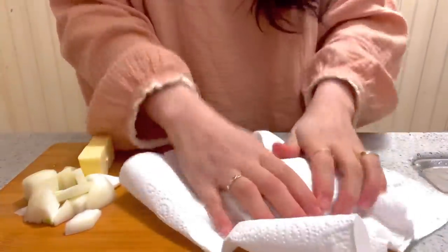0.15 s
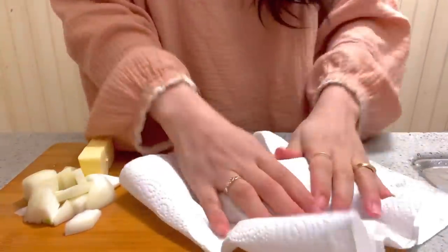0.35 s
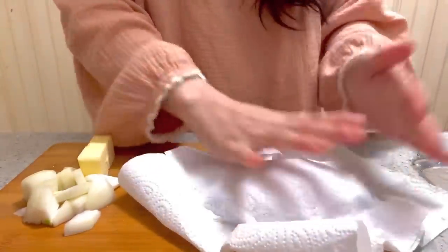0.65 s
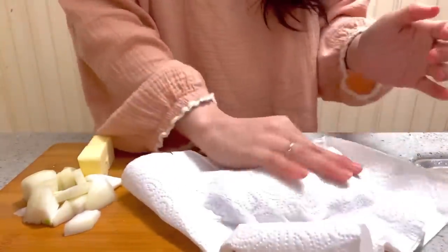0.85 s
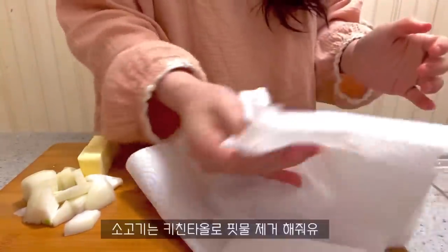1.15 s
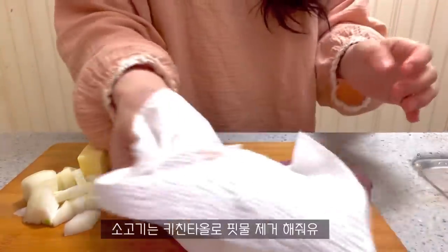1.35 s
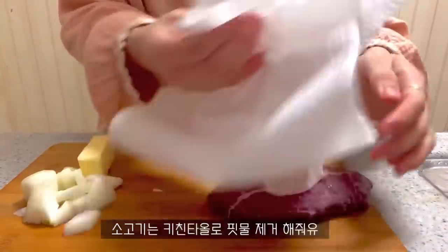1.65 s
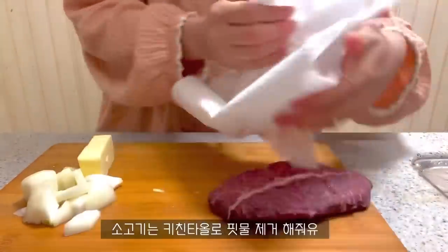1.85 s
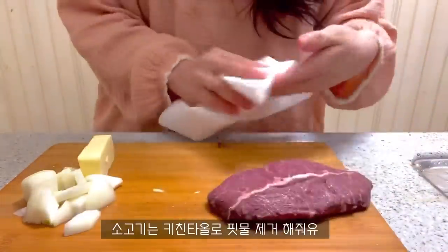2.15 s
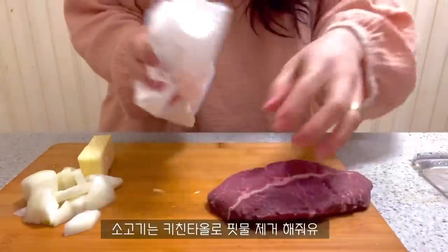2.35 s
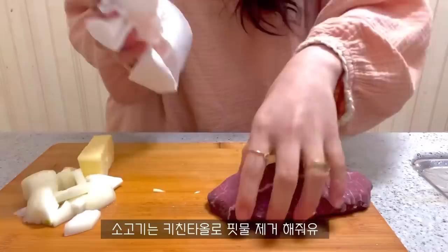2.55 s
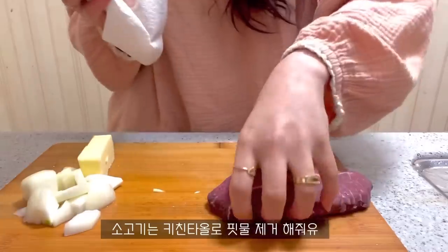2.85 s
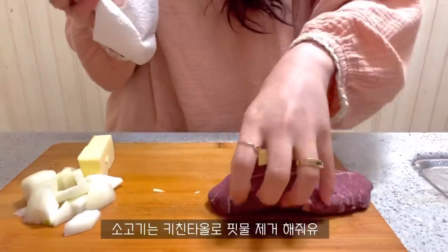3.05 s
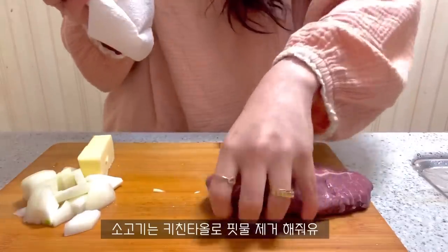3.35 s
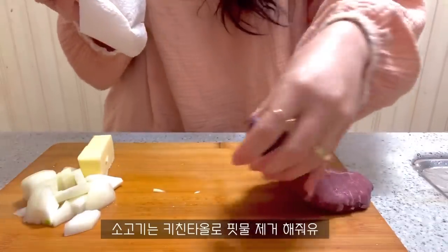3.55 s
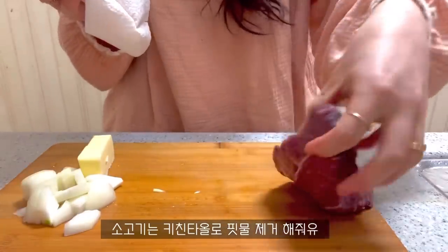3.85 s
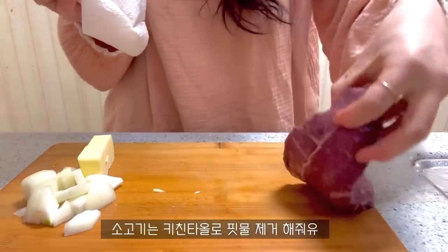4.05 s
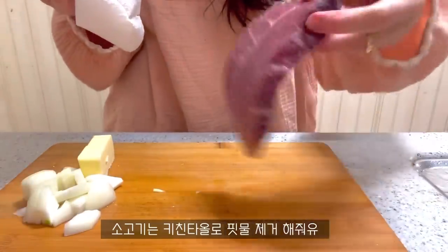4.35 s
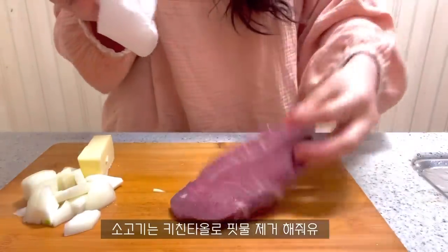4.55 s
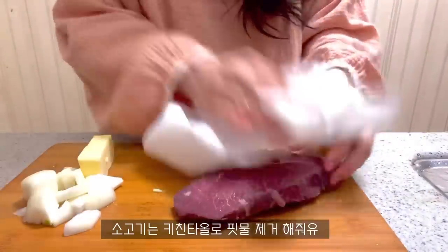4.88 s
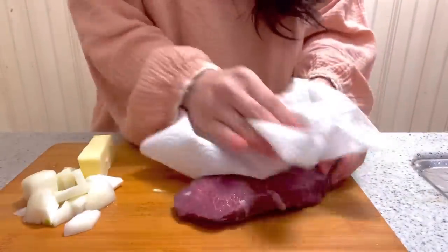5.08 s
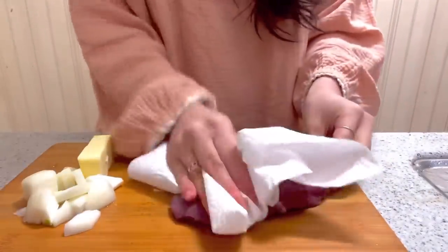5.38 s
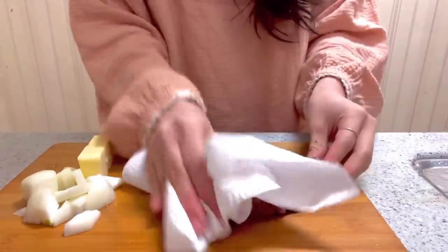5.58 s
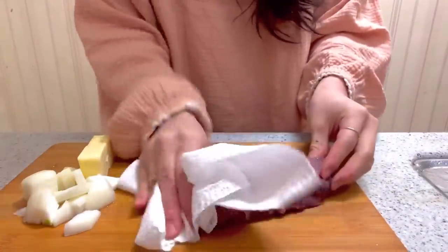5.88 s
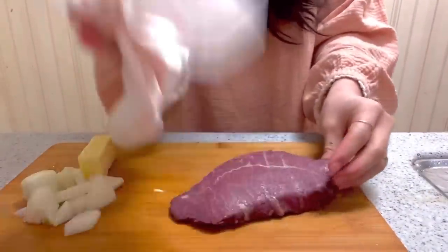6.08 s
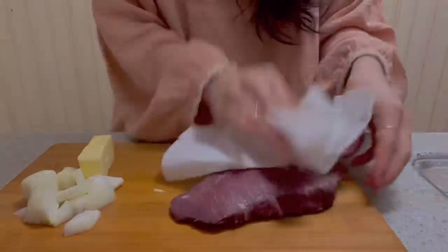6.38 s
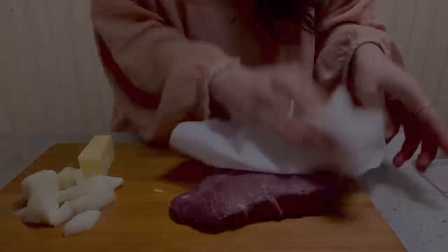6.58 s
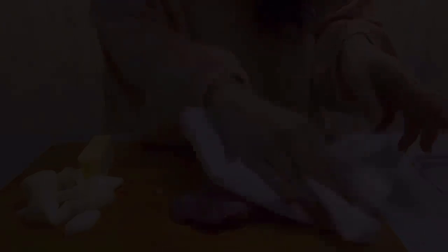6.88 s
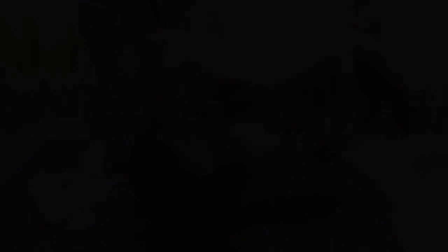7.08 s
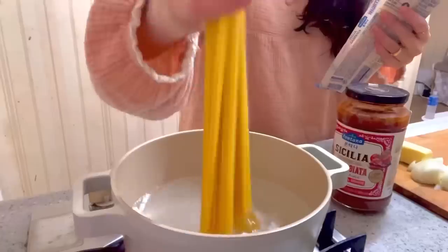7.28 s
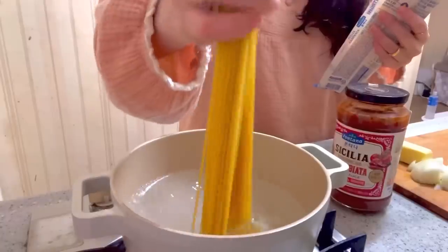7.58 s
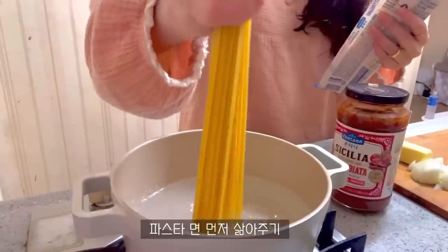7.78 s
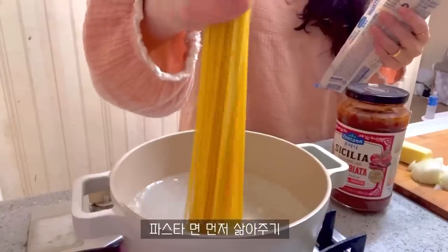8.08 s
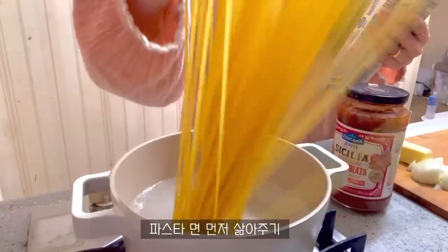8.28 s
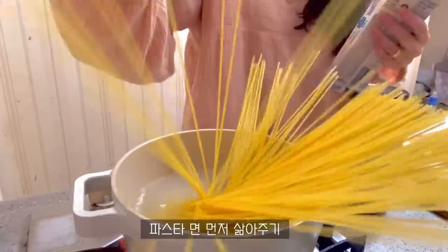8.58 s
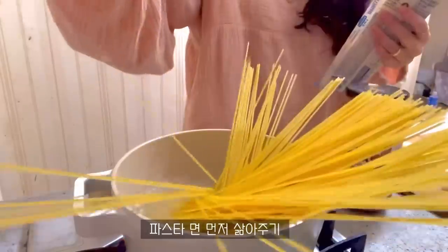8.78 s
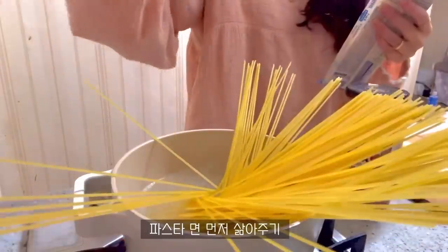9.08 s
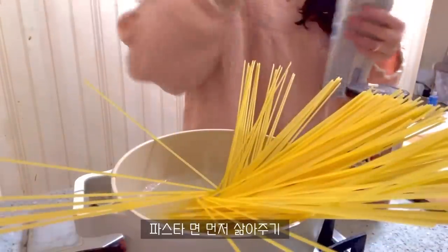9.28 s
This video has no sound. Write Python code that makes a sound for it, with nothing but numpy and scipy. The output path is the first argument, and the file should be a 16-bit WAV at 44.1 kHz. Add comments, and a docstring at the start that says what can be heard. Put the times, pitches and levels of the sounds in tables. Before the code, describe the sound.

Hands pat meat with a paper towel in soft thumps, then dry spaghetti taps and clatters into a pot, over a rumbling fan.

```python
"""Hands pat meat dry with a paper towel on a board: each pat puffs out air and thumps the counter.
Then the sound cuts to the stove: dry spaghetti is tapped on the floor of a pot over a gas burner and
let go to fan out, ticking and rubbing; at the end fat sizzles. A fan rumbles throughout.
A phone close by hears it all through two microphone ports a few centimetres apart."""
import sys
import numpy as np
from scipy import signal
from scipy.fft import rfft, irfft, next_fast_len
from scipy.io import wavfile
from scipy.ndimage import uniform_filter1d

SR = 44100
rng = np.random.default_rng(int(sys.argv[2]) if len(sys.argv) > 2 else 0)


def to_wav(s):
    """Save 16-bit WAV."""
    ch = np.atleast_2d(s).T  # columns
    pcm = np.round(np.clip(ch, -1, 1) * 32767)  # PCM
    wavfile.write(sys.argv[1], SR, pcm.astype(np.int16))


N = 415863

# Levels are relative. A fade_s or t60 is the time a sound takes to drop by 60 dB.
# fan and burner over time: time_s, rumble_db, hiss_db, sideways_lean
AIR_LEVELS = [(0, -36, -57.5, 1), (1.5, -37.5, -55, 4.5), (4.4, -39, -56, 4), (4.9, -37, -53.5, 2),
              (7.2, -36.5, -59, -1), (7.22, -39.5, -52.5, 4.5), (9.43, -40.5, -54.5, 3)]
# tone of each noise, from bass to treble: pitch_hz, level_db
RUMBLE_TONE = [(25, -24), (60, -9.5), (100, -10), (150, -1), (260, -7.5), (330, -22), (520, -32),
               (720, -37.5), (3000, -47)]
HISS_TONE = [(600, 18.5), (1000, 19), (3000, 5), (5800, -10.5), (8000, 2.5), (12000, -6), (15500, -23)]
FLAME_TONE = [(50, -16), (110, 1), (165, 3), (220, -17), (400, -41)]
FAT_TONE = [(500, -1), (1200, 6), (2600, 8), (5000, 0.5), (8000, 0.5), (15500, -2)]
PAPER_TONE = [(400, 7.5), (800, 2), (1500, 3.5), (3000, -2.5), (5500, -6), (9000, -7), (15500, -16)]
# pitches that stand out of the rumble and the two hisses: pitch_hz, width_hz, boost_db
RUMBLE_PEAKS = [(64.4, 5.6, 10), (138.9, 26, 8.5), (261.3, 49, 5), (354.6, 15, 11), (447.6, 35, 12),
                (936, 56, 18)]
FAN_PEAKS = [(7320, 160, 12.5), (7600, 144, 13.5), (8450, 68, 14), (9540, 135, 15.5)]
BURNER_PEAKS = [(868.5, 15, 16), (1490, 150, 10), (4470, 230, 13), (8420, 650, 20), (13100, 7600, -5)]
# notes that each thing rings with when hit: pitch_hz, level_db, fade_s
POT_NOTES = [(1930, -6, 0.02), (2103, -3, 0.034), (2245, 0.5, 0.027), (2483, -0.5, 0.02), (3060, 0, 0.0094),
             (4010, -5.5, 0.013), (4470, -10, 0.012)]
POT_WALL_NOTES = [(279, -5, 0.14), (290, -2.5, 0.084), (543, -4.5, 0.056), (1140, -4.5, 0.04),
                  (1450, 4, 0.084)]
COUNTER_NOTES = [(50.45, 5, 0.29), (70.5, 2.5, 0.21), (114, 6, 0.061), (262, -9.5, 0.12)]
# notes of the dry strands: pitch_hz, fade_s, level_db
STRAND_NOTES = [(4440, .015, -15), (4890, .05, -11), (7300, 0.006, -10.5), (8200, 0.0085, -12),
                (10070, .05, -14.5), (10980, 0.018, -8)]
# single strands snap against the rim: start_s, level_db, fade_s
RIM_SNAPS = [(8.305, -32, 0.067), (8.364, -38, .04), (8.662, -38, 0.17), (8.735, -30, 0.02),
             (8.756, -31, 0.016), (8.765, -36, 0.034), (8.919, -38, 0.02)]
# spaghetti ends hit the pot: start_s, level_db, fade_s, treble_db
BUNDLE_TAPS = [(7.264, -16.5, 0.053, -9), (7.275, -29, 0.22, -6), (7.586, -17, 0.072, -9.5),
               (7.631, -40, 0.25, -1.5), (8.104, -17.5, 0.13, -11.5), (8.162, -29.5, 0.28, -18),
               (8.218, -34.5, 0.082, -9)]
# the loose bundle knocks the rim, then falls against the wall: start_s, level_db, contact_s
BUNDLE_FALLS = [(8.411, -32, 0.00026), (8.427, -16, 0.00089)]
# a lone strand ticks the pot: start_s, level_db, pitch_hz, fade_s
STRAND_TICKS = [(7.216, -30, 800, .012), (7.373, -34, 3170, .04), (7.524, -34, 3230, .07),
                (7.668, -37, 3150, .04), (8.411, -21, 3700, 0.044), (8.679, -36, 4930, .04)]
# wet meat lets go of board and fingers: start_s, level_db, pitch_hz, fade_s
WET_SMACKS = [(2.757, -45, 3400, .02), (2.986, -43.5, 6960, .035), (3.159, -37, 2650, 0.0086),
              (3.195, -40.5, 730, 0.12), (3.229, -35.5, 2640, 0.08), (3.232, -40.5, 5800, 0.066),
              (3.235, -42, 1400, 0.17), (3.356, -27.5, 4670, 0.01), (3.448, -35, 6200, 0.011),
              (3.47, -30.5, 9700, 0.011), (4.548, -38.5, 2220, 0.023)]
# the towel is pulled, folded or rubbed: start_s, hold_s, level_db
TOWEL_PULLS = [(0.14, 0.049, -55), (.78, 0.055, -55), (1.05, 0.47, -47), (2.05, 0.074, -51.5)]
# short taps and puffs on the towel, and longer crumples: peak_s, level_db, width_s, trapped_air_hz
TOWEL_TOUCHES = [(.145, -45, .002, 4000), (.385, -52, 0.025, 2100), (.728, -44, 0.0038, 1350),
                 (1.361, -36, 0.0054, 796), (4.91, -44.5, 0.0086, 1010), (5.095, -45, 0.041, 1590),
                 (5.285, -45.5, 0.025, 1090), (5.461, -39, 0.0086, 2070), (5.615, -48, .028, 2010),
                 (5.805, -42.5, 0.0086, 1060), (6.04, -51, 0.029, 1100), (6.61, -48, 0.024, 1200),
                 (6.75, -41, 0.011, 840), (6.925, -46.5, 0.027, 900)]
# a hand pats the meat through the towel: time_s, slap_db, thump_db, trapped_air_hz
HAND_PATS = [(.196, -60, -30, 1200), (.434, -59, -33.5, 960), (0.706, -59, -33, 1220),
             (4.932, -34, -21.5, 605), (5.173, -39.5, -21.5, 1440), (5.355, -36.5, -21.5, 2020),
             (5.525, -38.5, -25.5, 1490), (5.706, -40, -21.5, 3350), (5.878, -41, -27.5, 1320),
             (6.322, -35.5, -23, 1910), (6.525, -39.5, -27.5, 1110), (6.722, -43.5, -21, 2140),
             (6.893, -41, -20.5, 690)]
# how the two ports differ: pitch_hz, half_phase_gap_turns, share_heard_alike (0 to 1)
PORT_GAPS = [(60, .03, .5), (250, .06, .3), (600, .125, .2), (5000, .13, .2), (6000, .165, .5),
             (7000, .1, .6), (7700, 0., 1.), (9400, 0., 1.), (10300, -.12, .6), (11300, -.247, 1.),
             (12800, -.253, 1.), (13600, -.38, .5), (14500, -.5, 1.)]

STOVE_SCENE_S = 7.21
TIME_S = np.arange(N) / SR


def undb(db):
    """Turn decibels into a gain to multiply by."""
    return 10 ** (np.asarray(db) / 20)


def unit(x):
    """Scale to an average (rms) level of 1."""
    return x / np.sqrt(np.mean(x ** 2))


def noise(length=N):
    """Two unrelated streams of white noise."""
    return rng.standard_normal((2, length))


def colour(x, tone, peaks=()):
    """Shape a sound by a tone curve and peaks; it comes out at level 1."""
    size = next_fast_len(N)
    freqs = np.arange(1, size // 2 + 2) * SR / size
    tone_hz, tone_db = np.transpose(tone)
    db = np.interp(np.log(freqs), np.log(tone_hz), tone_db)
    db += sum(boost / (1 + (2 * (freqs - hz) / width) ** 2) for hz, width, boost in peaks)
    return unit(irfft(rfft(x, size) * undb(db), size)[..., :N])


def ring(x, hz, t60):
    """Each push in x sets off one fading note."""
    pole = np.exp(2j * np.pi * hz / SR - np.log(1000) / (max(t60, 1e-3) * SR))
    return signal.lfilter([0, pole.imag], [1, -2 * pole.real, abs(pole) ** 2], x)


def wander(rate_hz):
    """Glide between random values, mostly within 1 of zero."""
    step = int(SR / rate_hz)
    held = np.repeat(rng.standard_normal(N // step + 1), step)
    return 1.2 * uniform_filter1d(held, step)[:N]


def crackle(per_s, spread_db):
    """Two streams of random clicks of uneven size."""
    clicks = (rng.random((2, N)) < per_s / SR) * noise()
    return unit(clicks * undb(spread_db * np.minimum(rng.exponential(size=(2, N)), 3)))


def bursts(rows, rise_s):
    """A gain that jumps up and fades for each row."""
    gain, t = np.zeros(N), np.arange(SR // 2) / SR
    for start_s, db, t60 in rows:
        i = int(start_s * SR)
        burst = undb(db - 60 * t / t60) * (1 - np.exp(-t / rise_s))
        gain[i:i + len(t)] += burst[:N - i]
    return gain


def swell(start_s, hold_s, db, rise_db_s=0, fall_db_s=0):
    """A gain that rises until start_s, holds, then falls."""
    before, after = np.maximum(start_s - TIME_S, 0), np.maximum(TIME_S - start_s - hold_s, 0)
    return undb(db - rise_db_s * before - fall_db_s * after)


def push(start_s, db, contact_s):
    """A soft hit: one smooth hump of force, duller the longer it lasts."""
    force, i, k = np.zeros(N), int(start_s * SR), int(contact_s * SR)
    force[i:i + k] = undb(db) * np.sin(np.pi * (np.arange(k) + .5) / k) * np.pi / 2 / k
    return force


def pops(rows):
    """Small clicks, each a short burst of noise around one pitch."""
    out, length = np.zeros((2, N)), SR // 5
    for start_s, db, hz, t60 in rows:
        i = int(start_s * SR)
        spit = noise(length) * undb(db - 60 * np.arange(length) / SR / t60)
        out[:, i:i + length] += .22 * ring(spit, hz, 5 / hz) + .06 * ring(spit, hz, 22 / hz) + .22 * spit
    return out


def room(x, fade_s=0.22, echo_db=-6):
    """The walls add a short echo; the second stream stands for scattered sound."""
    t = np.arange(SR // 3) / SR
    echo = noise(len(t)) * undb(-60 * t / fade_s)
    echo *= undb(echo_db) / np.sqrt(np.sum(echo ** 2, axis=1, keepdims=True))
    echo[0, 0], echo[1, 19] = 1, 1  # the first sound to arrive
    return signal.fftconvolve(x, echo, axes=1)[:, :N]


def ports(direct, scattered):
    """Sound reaches one port later, so their sum and difference cancel in turn up the treble."""
    size = next_fast_len(N)
    log_hz = np.log(np.arange(1, size // 2 + 2) * SR / size)
    hz, turns, share = np.transpose(PORT_GAPS)
    half_gap = 2 * np.pi * np.interp(log_hz, np.log(hz), turns)
    alike = np.clip(np.interp(log_hz, np.log(hz), share), 0, 1)
    direct, scattered = np.sqrt(2) * rfft([direct, scattered], size)
    mid = np.cos(half_gap) * direct
    side = np.sin(half_gap) * (-1j * alike * direct + np.sqrt(1 - alike ** 2) * scattered)
    return irfft(np.array([mid + side, mid - side]), size)[:, :N]


def fan_and_burner(roar_db=-35):
    """A fan rumbles and hisses; the sound cuts to the stove, where a burner already roars and hisses."""
    times, *columns = np.transpose(AIR_LEVELS)
    rumble_db, hiss_db, lean = [np.interp(TIME_S, times, column) for column in columns]
    fan, gas, draught, flame = noise(), noise(), noise(), noise()
    rumble = colour(fan, RUMBLE_TONE, RUMBLE_PEAKS) * undb(rumble_db + 1.33 * wander(12))
    rumble[1] += 0.12 * lean * rumble[0]  # moves the rumble to one side
    at_stove = TIME_S > STOVE_SCENE_S
    hiss = np.where(at_stove, colour(gas, HISS_TONE, BURNER_PEAKS), colour(draught, HISS_TONE, FAN_PEAKS))
    roar = at_stove * colour(flame, FLAME_TONE) * undb(roar_db + 3.04 * wander(13))
    return rumble + roar + hiss * undb(hiss_db)


def sizzle(start_s=9.366, rise_s=0.021, level_db=-29):
    """Water in hot fat bursts in a dense crackle."""
    rise = np.clip((TIME_S - start_s) / rise_s, 0, 1)
    return colour(crackle(5000, 1.8) + 1.2 * noise(), FAT_TONE) * rise * undb(level_db)


def strands(let_go_s=8.364, clatter_s=8.41, settled_s=8.62):
    """Brittle strands rub and tick on each other and the rim; their notes come and go as they touch."""
    slide = (TIME_S > let_go_s) * swell(let_go_s, hold_s=0, db=-36.5, fall_db_s=25)
    slide *= swell(settled_s, hold_s=0, db=0, fall_db_s=152)
    slide += swell(clatter_s, hold_s=0.064, db=-34.5, rise_db_s=253, fall_db_s=250)  # the bundle falls
    ticks = crackle(2600, 1.8) + .5 * noise()
    rattle = colour(ticks, [(700, -13), (1500, -14), (3500, -9), (5500, -6), (8000, 1), (15500, -2.5)])
    for hz, t60, db in STRAND_NOTES:
        touch = undb(6 * wander(30))
        rattle += undb(db) * unit(ring(ticks * touch, hz, t60))
    slide *= undb(1.6 * wander(100))
    return rattle * (slide + bursts(RIM_SNAPS, rise_s=0.00055))


def pot(ring_db=-29.5, rise_s=0.0017):
    """Spaghetti ends land as a shower of clicks that rings the pot; the falling bundle booms its wall."""
    shower = unit(crackle(3000, 2) + .5 * noise())
    taps = shower * bursts([row[:3] for row in BUNDLE_TAPS], rise_s)
    # each note answers a little differently as the ends land in new places
    body = sum(undb(ring_db + db) * ring(taps * undb(2.8 * wander(9)), hz, t60)
               for hz, db, t60 in POT_NOTES)
    edge = colour(shower, [(400, 10.5), (1300, -12), (4500, 2), (6000, 13), (8500, 11.5), (15500, 6)])
    edge *= bursts([(s, db + treble_db, t60) for s, db, t60, treble_db in BUNDLE_TAPS], rise_s)
    force = sum(push(*row) for row in BUNDLE_FALLS)
    boom = sum(undb(db) * ring(force, hz, t60) for hz, db, t60 in POT_WALL_NOTES)
    return body + edge + pops(STRAND_TICKS) + boom * np.array([[1], [.3]])


def meat():
    """Wet meat clicks as it comes unstuck."""
    return pops(WET_SMACKS)


def counter(fingers_s=0.01268, palm_s=0.0293, meat_lands_s=4.547):
    """Every blow comes in two pushes, like fingers and then palm; the counter and board ring low."""
    blows = [(s, db) for s, _, db, _ in HAND_PATS] + [(meat_lands_s, -38.5)]
    # knocks on the pot go on into the counter, later and weaker
    blows += [(s + 0.00765, db - 8) for s, db, *_ in BUNDLE_TAPS]
    (knock_s, _, _), (_, fall_db, _) = BUNDLE_FALLS
    blows.append((knock_s, fall_db - 9))
    force = sum(push(s + fingers_s, db, 0.002) + push(s + palm_s, db + 0.5, 0.0035) for s, db in blows)
    return -sum(undb(db) * ring(force, hz, t60) for hz, db, t60 in COUNTER_NOTES)


def towel(rest_db=-61.5, swish_even_db=-46.5, slap_s=0.0096, long_touch_s=.012, hollow_db=-5.5):
    """Creases crackle over a soft swish; each pat squeezes out a puff of air with a hollow note."""
    pull = undb(rest_db) * (TIME_S < STOVE_SCENE_S)  # the towel lying in the hand
    pull += sum(swell(*row, rise_db_s=114, fall_db_s=139) for row in TOWEL_PULLS)
    paper = colour(crackle(6000, 2.8) + 0.7 * noise(), PAPER_TONE)
    puff = colour(crackle(5000, 1.2),
                  [(200, 3.5), (650, 10), (1200, 0), (3300, -10), (6000, -12), (15500, -15.5)])
    # a fast pull drags air along: above swish_even_db the swish outgrows the crackle
    swish = colour(noise(), [(250, -4), (850, 1.5), (2200, -50)])
    swish *= pull ** 2 * undb(2.5 * wander(25) - swish_even_db)
    touches = [(s, db, width_s, hz, paper + puff if width_s > long_touch_s else puff)
               for s, db, width_s, hz in TOWEL_TOUCHES]
    slaps = [(s, db, slap_s, hz, puff) for s, db, _, hz in HAND_PATS]
    puffs = np.zeros((2, N))
    for peak_s, db, width_s, hz, texture in touches + slaps:
        peak = int(peak_s * SR)
        span = slice(max(peak - SR // 8, 0), peak + SR // 2)
        age = (TIME_S[span] - peak_s) / width_s
        squeeze = undb(db) * np.exp(-np.where(age < 0, 1.2 * age ** 2, 0.9 * age))
        hollow = unit(ring(noise(len(age)), hz, 8 / hz))  # trapped air rings for 8 cycles
        puffs[:, span] += squeeze * (texture[:, span] + undb(hollow_db) * hollow)
    paper *= undb(1.3 * wander(45))
    return pull * paper + swish + puffs


def scene():
    """Close sounds echo in the room; fan, burner and counter join them at the ports."""
    close = room(meat() + pot() + strands() + towel() + sizzle())
    direct, scattered = close + fan_and_burner()
    return ports(direct + .7 * counter(), scattered)


def record(dry, bottom_hz=36, top_hz=15800):
    """The phone drops the deepest bass and cuts the highest treble."""
    dry = signal.sosfilt(signal.butter(2, bottom_hz, "high", fs=SR, output="sos"), dry)
    return signal.sosfilt(signal.ellip(10, .2, 80, top_hz, fs=SR, output="sos"), dry)


dry = scene()
out = record(dry)
to_wav(out)
```